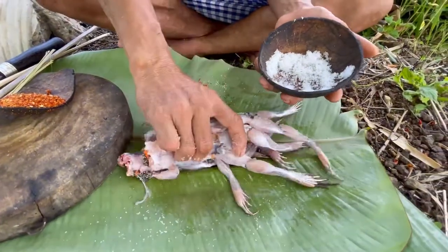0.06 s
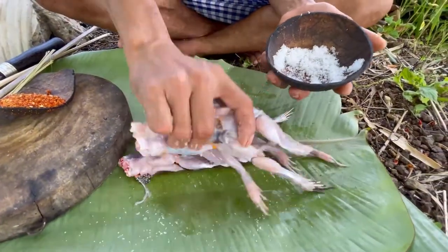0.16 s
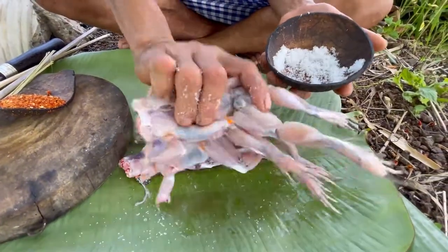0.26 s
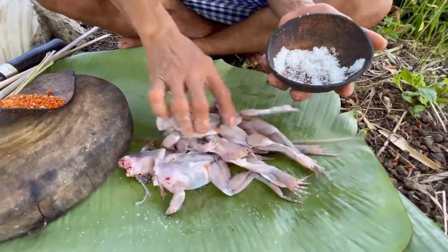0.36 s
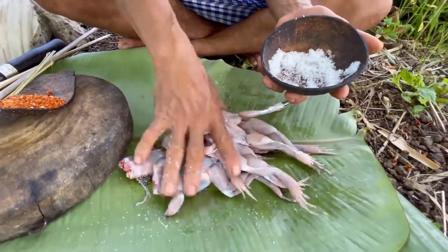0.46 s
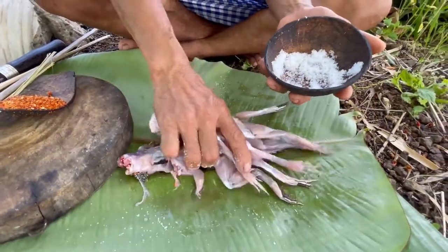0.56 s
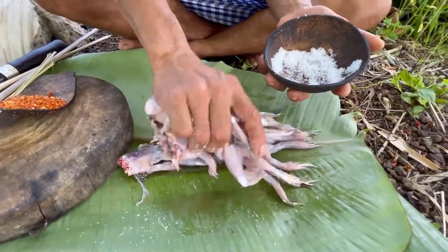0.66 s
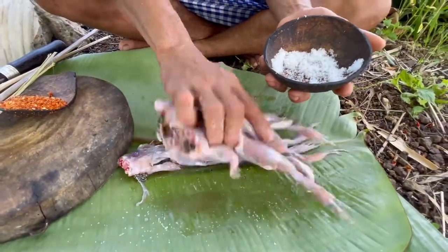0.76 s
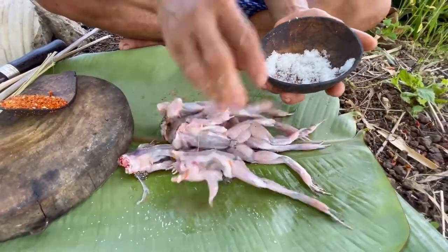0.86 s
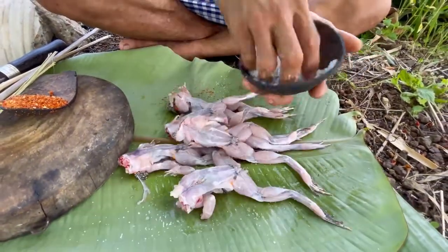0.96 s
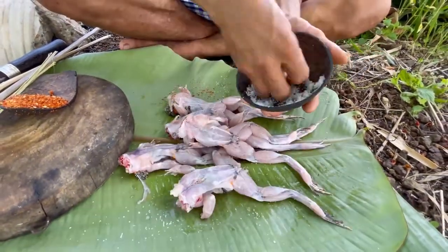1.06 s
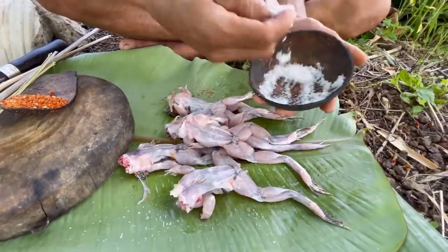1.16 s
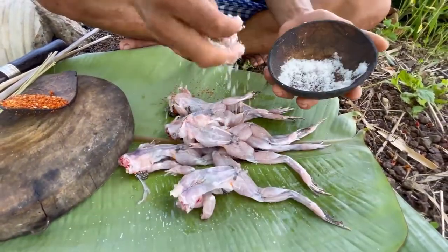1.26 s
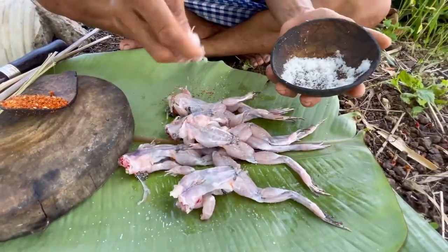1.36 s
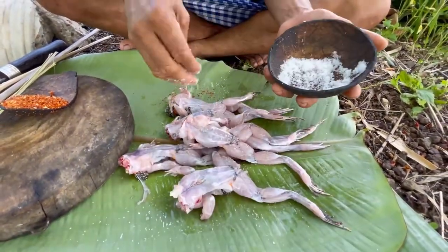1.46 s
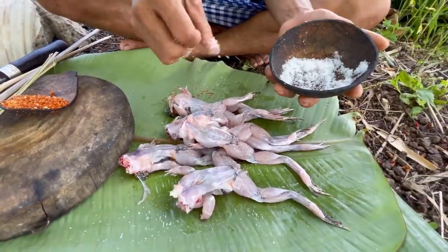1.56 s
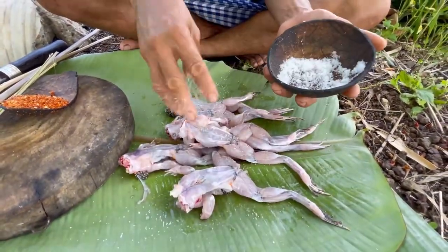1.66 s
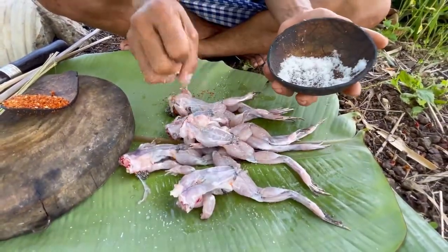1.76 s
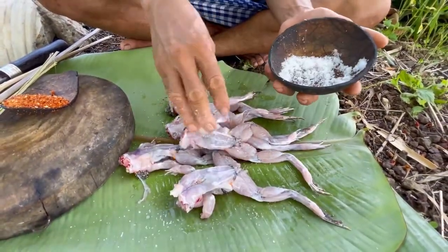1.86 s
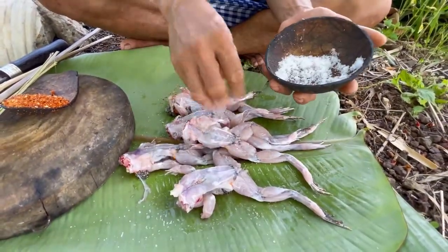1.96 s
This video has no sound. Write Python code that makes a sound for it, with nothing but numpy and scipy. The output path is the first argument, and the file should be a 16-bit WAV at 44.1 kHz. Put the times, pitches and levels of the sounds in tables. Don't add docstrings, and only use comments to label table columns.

```python
import sys
import numpy as np
from scipy import signal
from scipy.fft import rfft, irfft
from scipy.io import wavfile
from scipy.ndimage import uniform_filter1d

SR = 44100
rng = np.random.default_rng(int(sys.argv[2]) if len(sys.argv) > 2 else 0)


def unload_audio(sound):
    columns = np.transpose(np.atleast_2d(sound))
    steps = np.round(np.clip(columns, -1, 1) * 32767)
    wavfile.write(sys.argv[1], SR, steps.astype(np.int16))


def decibels_to_gain(level_db):
    exponent = np.asarray(level_db, float) / 20
    return 10 ** exponent


N = 88200
TIME = np.arange(N) / SR
SIDES = np.array([[1], [-1]])


def table(rows):
    return np.array(rows, float).T


def curve(rows, col=1, off_db=-120):
    columns = table(rows)
    return np.interp(TIME, columns[0], columns[col], off_db, off_db)


def unit(x):
    return x / np.sqrt(np.mean(x ** 2))


def colour(x, points):
    hz, db = table(points)
    f = np.maximum(np.arange(1025) * SR / 2048, 1)
    log_gain = np.interp(np.log(f), np.log(hz), db) * np.log(10) / 20
    cepstrum = irfft(log_gain)
    cepstrum[1:1024] *= 2
    cepstrum[1025:] = 0
    impulse = irfft(np.exp(rfft(cepstrum)))
    return signal.fftconvolve(np.atleast_2d(x), impulse[None])[:, :N]


def ring(x, hz, width_hz):
    b, a = signal.iirpeak(min(hz, 18000), hz / width_hz, fs=SR)
    return signal.lfilter(b, a, x)


def walk(per_s):
    hold = int(SR / per_s)
    steps = np.repeat(rng.standard_normal(N // 50), hold)[:N]
    return unit(uniform_filter1d(uniform_filter1d(steps, hold), hold))


def pair_noise(size):
    spread_hz, spread_max = 1460, 0.77
    f = np.arange(size // 2 + 1) * SR / size
    own = spread_max * f ** 2 / (f ** 2 + spread_hz ** 2)
    z = rfft(rng.standard_normal((3, size)))
    return irfft(np.sqrt(1 - own) * z[0] + np.sqrt(own) * z[1:], size)


def grains(per_s, spread_db, tail_s, bed_db):
    edges_hz = (0, 2800, 6000, 10500, 22050)
    shared = 0.5
    z = rfft(pair_noise(N))
    f = np.arange(N // 2 + 1) * SR / N
    size = decibels_to_gain(spread_db * np.minimum(rng.exponential(size=N), 2.5)) ** 2
    wide = rng.random(N) < shared * per_s / SR
    out = 0
    for lo, hi in zip(edges_hz, edges_hz[1:]):
        narrow = rng.random(N) < (1 - shared) * per_s / SR
        hits = (wide | narrow) * size
        power = signal.lfilter([1], [1, -np.exp(-2 / (tail_s * SR))], hits)
        band = irfft(z * ((f >= lo) & (f < hi)), N)
        out = out + band * np.sqrt(power / power.mean() + decibels_to_gain(bed_db) ** 2)
    return unit(out)


# (frequency [Hz], level [dB])
FAR_COLOUR = [(40, -36.5), (90, 1.5), (200, 1.5), (380, -6.5), (560, -17.5), (800, -39), (1800, -31),
              (16000, -31)]
# (frequency [Hz], side over mid [dB])
FAR_WIDTH = [(60, -6.5), (200, -12), (400, -10.5), (800, 3.5), (1500, 2), (15000, 2)]


def far():
    level_db, hum_hz, hum_db = -50, 318.8, 6
    mid = colour(rng.standard_normal(N), FAR_COLOUR)
    side = colour(colour(rng.standard_normal(N), FAR_COLOUR), FAR_WIDTH)
    mid = mid + decibels_to_gain(hum_db) * ring(mid, hum_hz, 6.3)
    return (mid + side * SIDES) / np.std(mid) * decibels_to_gain(level_db + 1.26 * walk(14.08))


# (time [s], level [dB], brightness [dB])
RUB_STROKES = [(0, -54, 0), (.085, -52, 5.5), (.112, -56, 0.5), (.2, -58.5, 4.5), (.25, -57, -9),
               (.28, -68, 8.5), (.4, -48.5, 2), (.44, -55.5, -5.5), (.48, -69.5, 5), (.51, -49.5, 1),
               (.56, -51.5, 2), (.64, -51, 3.5), (.7, -61, 5), (.75, -71.5, 11.5), (.88, -52.5, -2.5),
               (.92, -59, -2.5), (.975, -58, -2)]
# (frequency [Hz], level [dB])
SCRAPE_COLOUR = [(500, -2), (900, -5), (1500, 2), (2300, 0), (3000, -3.5), (5000, -11.5), (12000, -29),
                 (16000, -56)]
# (time [s], half length [s], level [dB])
SKIN_SLIPS = [
    (0.094, 0.015, -52),
    (0.786, 0.015, -54),
]


def rub():
    slip_hz = 6300
    scrape = unit(colour(grains(900, 2.1, 0.0016, -7), SCRAPE_COLOUR)) * decibels_to_gain(walk(40))
    crackle = grains(500, 3, 0.0007, 1)
    brightness_db = curve(RUB_STROKES, col=2) + 0.5 * walk(58)
    sticky = unit(ring(crackle, 8500, 19000)) * decibels_to_gain(brightness_db)
    slips = sum(decibels_to_gain(db) * np.exp(-((TIME - s) / half_s) ** 2) for s, half_s, db in SKIN_SLIPS)
    squeak = unit(ring(ring(crackle, slip_hz, 2900), slip_hz, 3800)) * slips
    return (scrape + sticky) * decibels_to_gain(curve(RUB_STROKES)) + squeak


# (time [s], peak [dB], ring [Hz], leaf thud [dB], thud [Hz])
POPS = [(0.0855, -29, 14500, -32.5, 7100), (0.098, -32, 7600, -34, 5330), (0.1325, -17, 14100, -34.5, 7260),
        (0.1578, -26.5, 6500, -39, 1510), (.193, -39.5, 4200, -43.5, 1950), (0.2, -35, 12200, -55, 1770),
        (.2104, -56, 5000, -43, 1370), (.232, -56, 5000, -43, 1140), (.24, -56, 5000, -45, 1580),
        (.2515, -56, 5000, -42.5, 1800), (0.4753, -33, 12500, -66, 1780), (.5003, -48, 6000, -46, 1300),
        (.5516, -57, 4000, -32, 1940), (0.6765, -29, 12600, -34, 10800), (.701, -36.5, 7000, -42, 1320),
        (0.9799, -33, 8100, -36.5, 1500), (0.9977, -31, 11200, -42, 1800), (1.0126, -23, 12000, -59, 1800)]
# (time [s], peak [dB], ring [Hz], leaf thud [dB], thud [Hz])
SALT_GRAINS = [(1.3207, -29, 7800, -43.5, 1680), (1.3395, -37, 10000, -55, 1980),
               (1.3455, -40, 14500, -62, 1970), (1.353, -37, 7000, -58, 2000),
               (1.3722, -35, 12200, -42.5, 1510), (1.381, -42, 12500, -50, 1700),
               (1.395, -38.5, 12500, -52, 1700), (1.4148, -49, 8110, -47, 1590),
               (1.4255, -39, 9000, -52, 1700), (1.437, -46, 8000, -55, 1700), (1.46, -49, 14500, -59, 1800),
               (1.475, -34.5, 8300, -44.5, 2070), (1.4835, -45, 8300, -63, 1900),
               (1.516, -46, 13900, -45, 1920), (1.5335, -33, 13000, -48, 2060),
               (1.539, -38, 7600, -42.5, 2090), (1.547, -36, 12960, -48, 2000),
               (1.56, -55, 12000, -46, 1910), (1.6835, -33.5, 11600, -44.5, 2010),
               (1.7138, -38, 12400, -51, 1380), (1.7295, -41, 10000, -46, 1500),
               (1.7418, -32, 11000, -45, 1390), (1.7475, -34, 13500, -48, 1900),
               (1.7595, -34, 14000, -46, 1500), (1.7688, -29, 12500, -42.5, 2190),
               (1.782, -48, 10870, -52, 1520), (1.8422, -34, 15300, -38, 15000),
               (1.854, -39, 12000, -50, 2600), (1.8808, -32, 6800, -38, 1470),
               (1.8835, -34, 14000, -39.5, 1400), (1.894, -39, 11000, -49, 1370),
               (1.897, -32, 3980, -36.5, 1400), (1.914, -47, 11000, -48, 1500),
               (1.92, -41, 13000, -49, 1600), (1.9482, -33.5, 12500, -48, 1940),
               (1.9823, -40.5, 4470, -54, 1800)]


def ticks():
    burst_s, ring_q = 0.0011, 4
    thud_s, thud_width_hz = 0.0021, 420
    out = np.zeros((2, N + 2000))
    t = np.arange(800) / SR
    for s, db, hz, thud_db, thud_hz in POPS + SALT_GRAINS:
        burst = pair_noise(len(t)) * np.exp(-t / burst_s) * np.minimum(t / 0.0002, 1)
        bright = ring(burst, hz, hz / ring_q) + 0.17 * np.diff(burst, prepend=0)
        thud = ring(pair_noise(len(t)) * np.exp(-t / thud_s), thud_hz, thud_width_hz)
        i = int(s * SR)
        out[:, i:i + len(t)] += decibels_to_gain(db) * bright / abs(bright).max()
        out[:, i:i + len(t)] += decibels_to_gain(thud_db) * thud / abs(thud).max()
    return out[:, :N]


# (time [s], level [dB])
FIRST_FLOP = [(.3385, -42), (.341, -32.5), (.352, -28), (.358, -23.5), (.366, -33.5), (.374, -26),
              (.379, -33), (.41, -58)]
# (time [s], level [dB])
SECOND_FLOP = [(.805, -51), (.823, -43.5), (.827, -32.5), (.835, -33), (.842, -33), (.862, -39),
               (.868, -57), (.885, -75)]
# (frequency [Hz], level [dB])
CRINKLE_COLOUR = [(150, -9), (250, -12.5), (698, -9.5), (1020, -5.5), (1910, -6), (2800, -12.5),
                  (3910, -11.5), (13700, -22), (16000, -28)]
# (time [s], peak [dB], pitch [Hz], 60 dB decay [s])
WET_SMACKS = [(.3415, -19, 1300, 0.0054), (0.3462, -28.5, 1500, 0.016), (.3492, -16, 1075, 0.0055),
              (0.3528, -3.5, 1780, 0.0055), (.3528, -17, 3760, 0.0047), (0.3555, -22.5, 1554, 0.011),
              (0.3541, -27.5, 412, 0.015), (0.359, -25, 1340, 0.024), (.362, -24, 2050, 0.013),
              (0.362, -25, 3850, 0.006), (.3682, -25, 1520, .012), (.37, -22, 1730, 0.0064),
              (.3728, -19.5, 1240, 0.0056), (.3748, -21, 1450, 0.0045), (0.3855, -36, 1540, 0.012),
              (.388, -36, 1076, 0.0088), (0.8243, -37, 1480, .015), (.8278, -36, 2060, 0.016),
              (.829, -32, 775, 0.017), (0.8305, -30.5, 1440, 0.016), (0.835, -37, 1190, .01),
              (0.8338, -34, 3840, .02), (.8365, -36.5, 750, 0.013), (0.8392, -20.5, 3900, 0.0073),
              (0.839, -30, 1380, 0.018), (0.8493, -38.5, 3920, 0.024), (0.853, -45, 1200, 0.014),
              (.888, -45, 1440, 0.028), (0.898, -45, 1410, 0.023), (0.907, -46.5, 2060, 0.032),
              (0.982, -31, 2200, 0.008), (.508, -37, 1430, 0.013)]


def flops():
    crinkle = unit(colour(grains(1300, 2.7, 0.003, -1.5), CRINKLE_COLOUR))
    out = crinkle * (decibels_to_gain(curve(FIRST_FLOP) - 4.5) + decibels_to_gain(curve(SECOND_FLOP) - 3.0))
    t = np.arange(2000) / SR
    attack = np.minimum(t / 0.00082, 1)
    for s, db, hz, t60 in WET_SMACKS:
        i = int(s * SR)
        out[:, i:i + len(t)] += decibels_to_gain(db - 60 * t / t60) * np.sin(2 * np.pi * hz * t) * attack * 1.69
    return out


# (time [s], level [dB], tilt to fine salt [dB])
SCOOP_STROKES = [
    [(.997, -60, 0), (.999, -42, 15), (1.007, -54, 13), (1.014, -43.5, 8), (1.019, -56, 9),
     (1.028, -58, 19)],
    [(1.028, -48, 18), (1.036, -38.5, 2.5), (1.058, -37, 9), (1.075, -44.5, -9), (1.1, -39, 4.5),
     (1.112, -39, -8.5), (1.128, -40, -3), (1.142, -47, 8), (1.148, -60, 9)],
    [(1.16, -73, 17), (1.2, -60, 12), (1.24, -63, 24), (1.27, -91, 6)],
]
# (frequency [Hz], level [dB])
CRUSH_COLOUR = [(600, -27), (1000, -38), (2200, -22), (4000, -16), (5800, -20), (6600, -2), (9000, -6),
                (15500, -13)]


def scoop():
    bowl_hz, bowl_width_hz, bowl_db, body_db = 2630, 126, -6, -47.5
    bowl_from_s, fade_db_per_s = 0.98, 108
    crush = grains(2200, 2.5, 0.001, -3)
    salt = unit(colour(crush, CRUSH_COLOUR))
    fine = ring(salt, 13200, 3900)
    coarse = ring(salt, 8270, 3500)
    since = TIME - bowl_from_s
    fade = (since > 0) * decibels_to_gain(-fade_db_per_s * np.abs(since))
    bowl = decibels_to_gain(bowl_db + 2.9 * walk(45.3)) * unit(ring(crush, bowl_hz, bowl_width_hz)) * fade
    out = decibels_to_gain(body_db + 3 * walk(51.2)) * unit(ring(crush, 1000, 3500)) * fade * (since < 0.17)
    for stroke in SCOOP_STROKES:
        tilt_db = np.clip(curve(stroke, col=2), -12, 12)
        tilted = salt + bowl + fine * (decibels_to_gain(tilt_db) - 1) + coarse * (decibels_to_gain(-tilt_db) - 1)
        out = out + tilted * decibels_to_gain(curve(stroke))
    return out


# (start [s], length [s], level [dB])
SALT_SHOWERS = [(1.321, 0.0063, -51.5), (1.345, 0.027, -59.5), (1.373, 0.012, -50), (1.386, 0.061, -58.5),
                (1.46, 0.028, -60.5), (1.529, 0.021, -49), (1.55, 0.029, -60), (1.68, 0.019, -57),
                (1.713, 0.065, -51), (1.777, 0.031, -58.5), (1.847, 0.028, -57), (1.872, .014, -49),
                (1.889, 0.011, -43.5), (1.903, 0.039, -54), (1.947, 0.01, -50.5), (1.95, .05, -61.5)]
# (frequency [Hz], level [dB])
PATTER_COLOUR = [(350, -33), (600, -14.5), (1280, -7), (2090, -5.5), (2610, -14.5), (3990, -5), (5630, -9),
                 (14500, -7), (16000, -15.5)]


def shower():
    edge_s = 0.0035
    envelope = 0
    for start, length, db in SALT_SHOWERS:
        inside_s = np.minimum(TIME - start, start + length - TIME)
        envelope = envelope + decibels_to_gain(db) * np.clip(inside_s / edge_s + 0.5, 0, 1)
    return unit(colour(grains(900, 2.5, 0.001, -3), PATTER_COLOUR)) * envelope


def scene():
    lag_s, lag_top_hz, pan_db = 1e-4, 5200, 3
    near = rub() + flops() + scoop() + shower() + ticks()
    f = np.arange(N // 2 + 1) * SR / N
    lag = np.exp(1j * np.pi * SIDES * lag_s * f / (1 + (f / lag_top_hz) ** 3))
    return irfft(rfft(near) * lag, N) * decibels_to_gain(SIDES * pan_db / 2 + 0.5) + far()


def band_limit(x):
    return signal.sosfilt(signal.butter(12, 16810, fs=SR, output="sos"), x)


def record(dry):
    top_cut = signal.ellip(8, 0.2, 60, 15800, fs=SR, output="sos")
    low_cut = signal.butter(3, 94, "high", fs=SR, output="sos")
    mix = signal.sosfilt(low_cut, signal.sosfilt(top_cut, dry))
    return band_limit(mix)


dry = scene()
out = record(dry)
unload_audio(out)
```